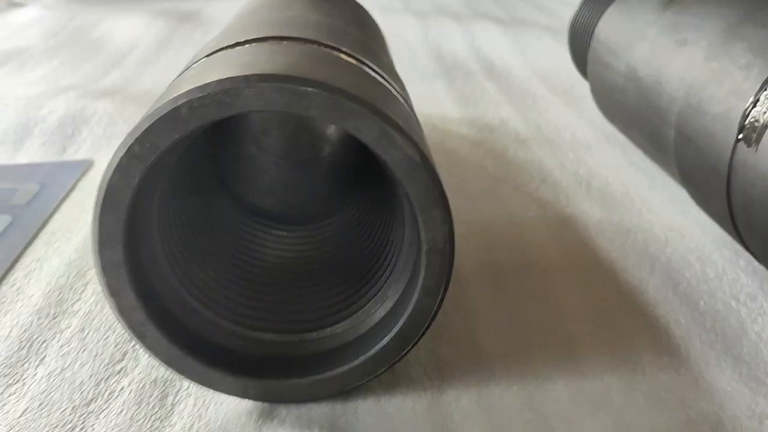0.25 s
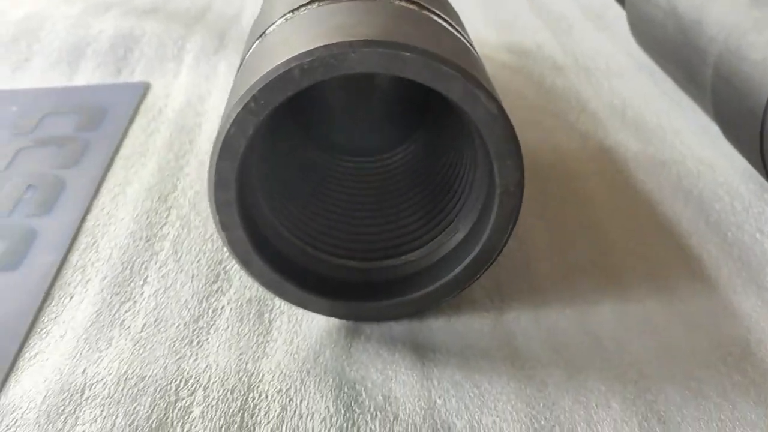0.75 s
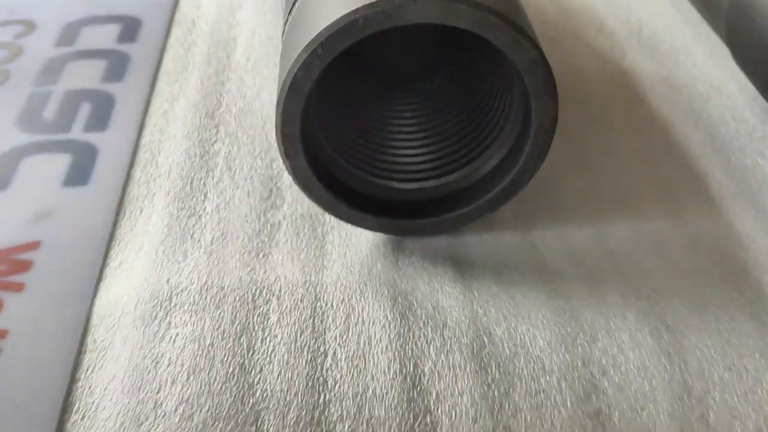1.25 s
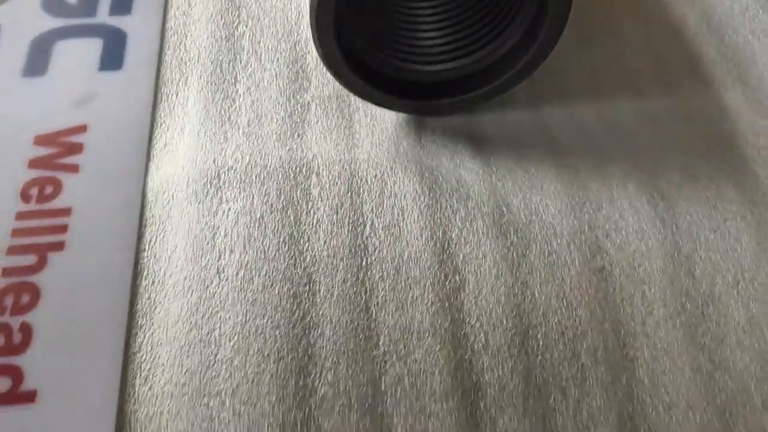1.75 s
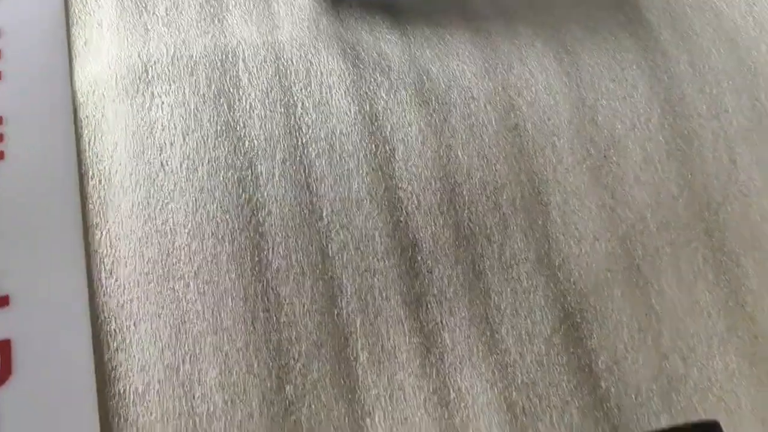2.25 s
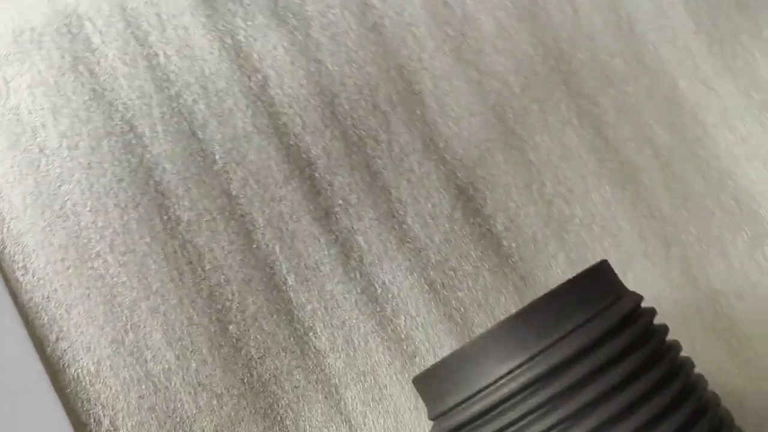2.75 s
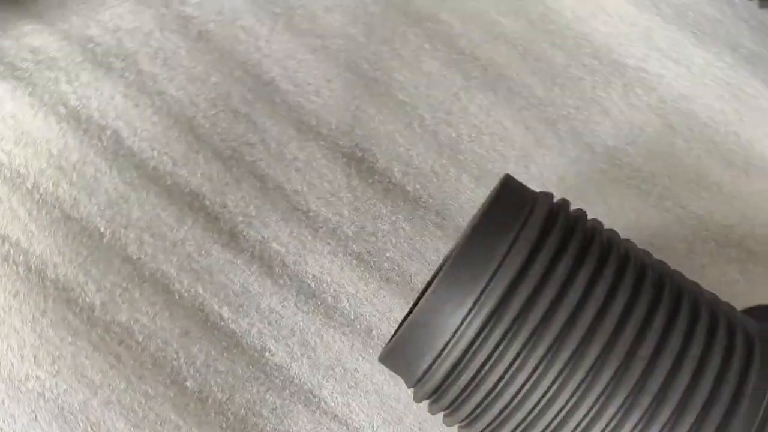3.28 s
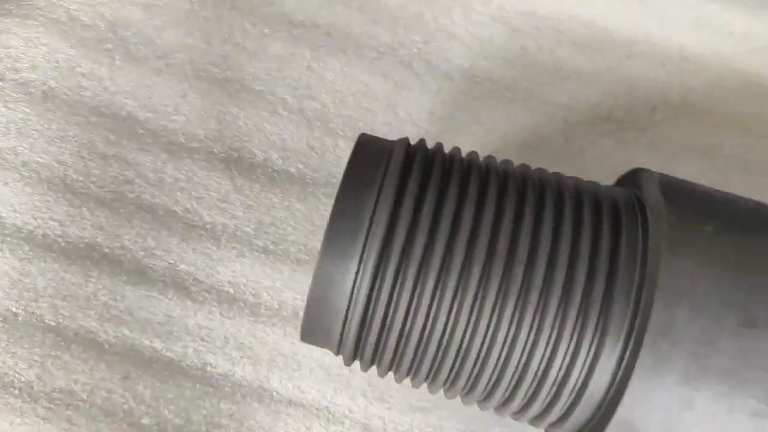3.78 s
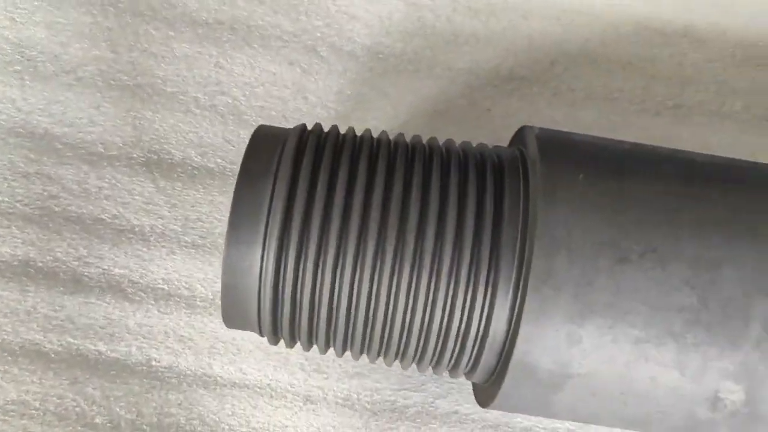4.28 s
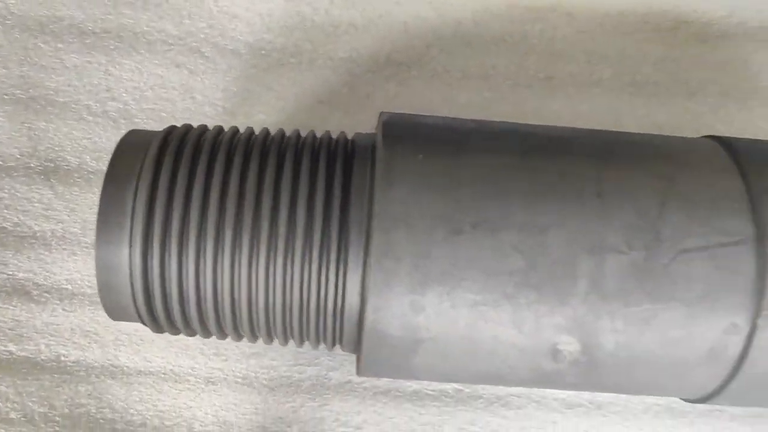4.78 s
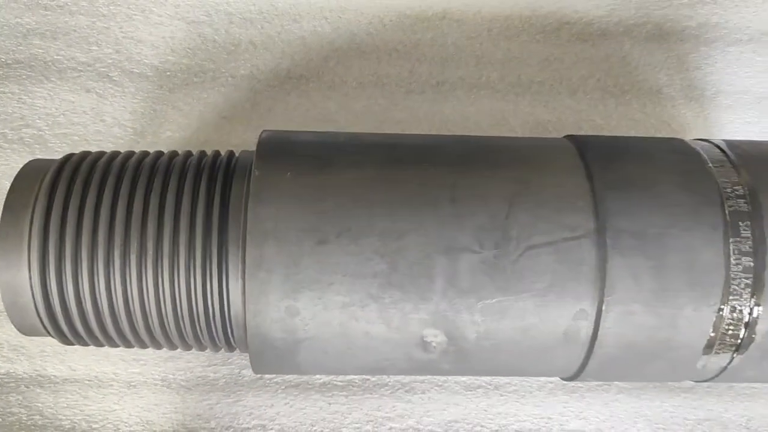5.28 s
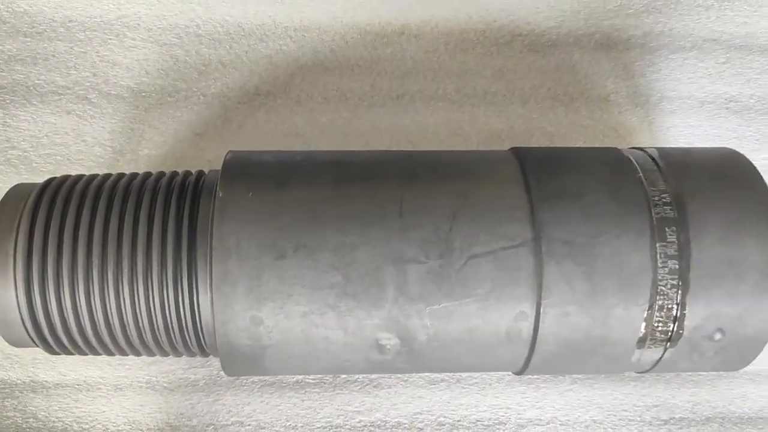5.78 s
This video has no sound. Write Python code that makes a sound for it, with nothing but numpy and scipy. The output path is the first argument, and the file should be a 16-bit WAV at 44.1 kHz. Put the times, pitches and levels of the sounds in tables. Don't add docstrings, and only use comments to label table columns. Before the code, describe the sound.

A constant dull machinery drone, loose clatter and rushing air fill a big indoor hall, heard through a hand-held mono phone. Three piercing but faint gear tones drift in and out. After one distant knock, something taps the phone body twice, quietly then harder. Later, far metal is knocked and scraped in quick succession with deep echoing thuds, and the machine noise continues, a little softer, to the end.

```python
import sys
import numpy as np
from scipy import signal
from scipy.fft import rfft, irfft
from scipy.io import wavfile

SR = 44100
rng = np.random.default_rng(int(sys.argv[2]) if len(sys.argv) > 2 else 0)


def transcribe(signal):
    frames = np.atleast_2d(signal).T
    limited = np.clip(frames, -1, 1)
    pcm = np.round(limited * 32767).astype(np.int16)
    wavfile.write(sys.argv[1], SR, pcm)


def volts_from_db(level):
    exponent = np.asarray(level, float) / 20
    return 10 ** exponent


N = 265923
T = np.arange(N) / SR

# (time [s], level [dB])
LOAD_CURVE = [(0.0, -36.5), (0.47, -39), (0.89, -39), (1.28, -42.5), (2.5, -45), (3.21, -43), (3.59, -43),
              (3.9, -42), (4.1, -38.5), (4.6, -36), (4.79, -38), (6.03, -44.5)]
# (time [s], level [dB])
FACING_CURVE = [(0, -40.5), (.2, -43.5), (.7, -45.5), (.92, -47.5), (1.15, -43), (1.6, -42.5), (2.0, -41),
                (2.68, -41), (2.79, -47), (3.4, -49), (4.17, -48.5), (4.23, -43.5), (4.32, -49), (4.8, -50),
                (6.03, -48.5)]
# (time [s], level [dB])
FLOW_CURVE = [(0, -37.5), (.35, -40), (.95, -44.5), (1.15, -38), (1.5, -39.5), (2.6, -38), (2.85, -39.5),
              (3.28, -41), (3.45, -46), (4.15, -44.5), (4.8, -41.5), (5.1, -45.5), (6.03, -44.5)]
LAYER_LEVELS = {"rumble": (-46.5, 0.81, -0.17, -0.17, 3), "drone": (-39, 0.7, 0.22, -0.06, 40),
                "upper drone": (-43, 1.27, -0.1, 0.31, 40), "clatter": (-41, 0.36, 0.1, 0.22, 40),
                "hiss": (-41.5, 0.17, -0.01, 0.9, 60), "upper hiss": (-43.5, 0.51, 0.63, 0.36, 60),
                "top": (-45.5, 0.26, 0.66, 0.15, 90), "jet": (-54.5, -0.5, 2, 0.1, 150)}

# (frequency [Hz], level [dB per Hz])
RUMBLE_COLOUR = [(30, -48), (40, -40), (55, -20), (80, -4.5), (110, 1), (150, 3.5), (185, -20.5)]
DRONE_COLOUR = [(140, -18), (175, -3.5), (220, -2), (280, -2.5), (340, -20.5)]
UPPER_DRONE_COLOUR = [(260, -18), (310, 1), (350, 0.5), (395, -7), (440, -4.5), (510, -15), (580, -30)]
CLATTER_COLOUR = [(260, -20), (450, -15), (549, -6.5), (674, -0.5), (811, -7.5), (902, -5), (1200, -9),
                  (1390, -6), (1620, -10), (2400, -6), (2450, -22), (3180, -4), (5390, -120)]
HISS_COLOUR = [(2200, -50.5), (2450, 5), (3000, -2.5), (3800, 5), (4250, 1.5), (4450, -2.5), (4700, -5)]
UPPER_HISS_COLOUR = [(4200, -5), (4450, -2.5), (4900, 2.5), (5300, -2), (6500, -1), (7300, -1.5),
                     (7800, -7.5), (8200, -32)]
# (frequency [Hz], level [dB per Hz])
FILL_COLOUR = [(4880, -57), (8300, -7.5), (8510, -35), (9010, -9), (9630, -3), (11500, 2), (13100, 0),
               (14500, 4.5), (15200, 3.5), (16000, -13)]
# (frequency [Hz], level [dB per Hz])
JET_COLOUR = [(9500, -27), (11000, -0.5), (12500, 0.5), (14300, -4), (15300, -32)]

# (time [s], burst [dB], burst length [s], plate ring [dB], thud [dB])
KNOCK_EVENTS = [
    (1.16, -39, 0.027, -49, -40.5),
    (3.272, -52.5, 0.026, -44, -52.5),
    (3.906, -34, 0.045, -44, -30),
    (4.184, -36.5, 0.15, -47.5, -54),
    (4.243, -39.5, 0.025, -57, -49),
    (4.393, -40, 0.082, -47, -31.5),
    (4.59, -39.5, 0.077, -42.5, -38.5),
    (4.659, -41.5, 0.058, -56, -48.5),
]
# (frequency [Hz], level [dB per Hz])
BURST_COLOUR = [(500, -7.5), (900, -6), (1500, -4), (3000, -4), (5000, -17.5), (7300, -12), (8000, -46.5)]
# (frequency [Hz], level [dB], time to fall 60 dB [s])
PLATE_MODES = [(1395, 4.5, 0.17), (2050, -0.5, 0.23), (2960, -7.5, 0.052)]
# (time [s], swing [dB], body note [Hz], time to fall 60 dB [s], sharp edge [dB])
TAP_EVENTS = [
    (2.1516, -22, 330, .016, -23),
    (2.1517, -22, 1200, .004, -60),
    (2.1686, -40, 900, .003, -26),
    (2.7731, -12.5, 1050, .003, -20),
]

# (frequency [Hz], width [Hz])
HUM_NOTES = [(217, 12), (144.5, 9)]
# (time [s], level [dB], half length [s])
HUM_SWELLS = [
    [(0, -43, .3), (1.15, -36, .3), (1.7, -39.5, .3), (3.3, -47, .8), (4.55, -40, .3)],
    [(2.62, -45, .15), (4.65, -44, .2), (5.15, -42, .3)],
]
HUM_FLOOR = (-55.5, -58)
WHINE_TONES = (2509, 4384.5, 5018)
# (time [s], level [dB], half length [s])
WHINE_SWELLS = [
    [(.46, -53, .44), (.98, -57, .1), (1.65, -51, .42), (2.54, -51.5, .39), (3.14, -50, .28),
     (3.79, -47, .28), (4.32, -48.7, .35), (5.04, -44, .3), (5.97, -52, .29)],
    [(.48, -52, .1), (.71, -55.6, .21), (1.64, -43.7, .27), (2.11, -43.7, .25), (2.95, -39.6, .22),
     (4.13, -53.4, .25), (4.79, -56, .12), (5.4, -59, .4)],
    [(.16, -43, .41), (.7, -45.2, .1), (1.29, -36.9, .24), (1.79, -38.7, .4), (2.58, -37.6, .25),
     (3.11, -44.4, .1), (3.47, -45.4, .1), (3.99, -40.4, .23), (5.15, -42.4, .4), (5.7, -54.4, .47)],
]
WHINE_FLOOR = (-66, -56.5, -66)

# (frequency [Hz], level over the masking level [dB])
STORED_LEVEL = [(100, -30), (1500, -11), (2050, -6), (2350, -2.5), (2800, -6), (3500, -6), (4700, -3),
                (5400, -5.5), (6200, -4.5), (7500, -2), (8500, 5), (10000, 0), (12000, -2.5), (13200, -2),
                (14500, -6), (15700, 2)]


def rms_one(x):
    return x / np.sqrt(np.mean(x ** 2) + 1e-20)


def swing_db(curve):
    seconds, level = np.transpose(curve)
    db = np.interp(T, seconds, level)
    return db - db.mean()


def drift(rate):
    r = np.exp(-80 * np.pi * rate / SR)
    chance = rng.standard_normal(N // 40 + 2002)
    slow = signal.lfilter([1], [1, -2 * r, r * r], chance)[2000:]
    return np.interp(np.arange(N) / 40, np.arange(len(slow)), rms_one(slow))


def coloured(colour, patchy_db, rate, count):
    hz = np.fft.rfftfreq(N, 1 / SR) + 1e-3
    points_hz, points_db = np.transpose(colour)
    shape = volts_from_db(np.interp(np.log(hz), np.log(points_hz), points_db, -200, -200))
    spectrum = rfft(rng.standard_normal(N)) * shape
    place = np.log(hz / points_hz[0]) / np.log(points_hz[-1] / points_hz[0]) * (count - 1)
    out = 0
    for k in range(count):
        band = irfft(spectrum * np.clip(1 - abs(place - k), 0, 1), N)
        out = out + band * volts_from_db(patchy_db * drift(rate))
    return rms_one(out)


def ring(x, hz, t60):
    r = volts_from_db(-60 / (t60 * SR))
    w = 2 * np.pi * hz / SR
    return signal.lfilter([0, np.sin(w)], [1, -2 * r * np.cos(w), r * r], x + 1e-18)


def gain_for(layer, lag=0):
    mean_db, load, facing, flow, fall = LAYER_LEVELS[layer]
    db = load * swing_db(LOAD_CURVE) + facing * swing_db(FACING_CURVE) + flow * swing_db(FLOW_CURVE)
    db = np.interp(T - lag, T, db)
    return volts_from_db(mean_db + np.maximum.accumulate(db + fall * T) - fall * T)


def spots(rows, between_db):
    gain = volts_from_db(between_db)
    for s, db, half in rows:
        gain = gain + volts_from_db(db) * np.exp(-((T - s) / half) ** 2)
    return gain


def hall_rumble():
    return gain_for("rumble", lag=0.35) * coloured(RUMBLE_COLOUR, 1.0, 3.7, count=3)


def far_knocks():
    hall_t60, tail_db = 1.7, -4.5
    burst, strikes, thud = np.zeros((3, N))
    for s, burst_db, length, ring_db, thud_db in KNOCK_EVENTS:
        age = np.maximum(T - s, 0)
        tail = (T >= s) * volts_from_db(-60 * age / hall_t60)
        held = (T >= s) * np.exp(-(age / length) ** 4)
        rise = 1 - np.exp(-age / (0.03 * length))
        burst += volts_from_db(burst_db) * (held + volts_from_db(tail_db) * tail) * rise
        strikes += volts_from_db(ring_db) * held
        thud += volts_from_db(thud_db) * tail * (1 - np.exp(-age / 0.041))
    plate = 0
    for hz, db, t60 in PLATE_MODES:
        rubbing = strikes * rng.standard_normal(N)
        plate = plate + volts_from_db(db) * ring(rubbing, hz, t60) / np.sqrt(t60 * SR / 27.6)
    low = coloured([(90, -19.5), (200, -6), (400, -10.5), (900, -14), (1200, -25)], 1.2, 9.1, count=4)
    return burst * coloured(BURST_COLOUR, 3.9, 37.0, count=8) + plate + thud * low


def jolt(age, hz, t60):
    rise_s = .00007
    fade = volts_from_db(-60 * np.maximum(age - .5 / hz, 0) / t60)
    swing = -np.cos(2 * np.pi * hz * age) * fade
    return swing * np.exp(np.minimum(age, 0) / rise_s)


def finger_taps():
    out = 0
    for s, body_db, hz, t60, edge_db in TAP_EVENTS:
        out = out + volts_from_db(body_db) * jolt(T - s, hz, t60)
        out = out + volts_from_db(edge_db) * jolt(T - s, 1900, .0013)
    return out


def air_hiss():
    out = gain_for("hiss") * coloured(HISS_COLOUR, 1.5, 8.7, count=8)
    return out + gain_for("upper hiss") * coloured(UPPER_HISS_COLOUR, 2.8, 22.0, count=8)


def casing_hum():
    out = 0
    for rows, db, (hz, width) in zip(HUM_SWELLS, HUM_FLOOR, HUM_NOTES):
        t60 = np.log(1000) / np.pi / width
        out = out + spots(rows, db) * rms_one(ring(rng.standard_normal(N), hz, t60))
    return out


def machine_drone():
    out = gain_for("drone") * coloured(DRONE_COLOUR, 0.66, 4.8, count=3)
    out += gain_for("upper drone") * coloured(UPPER_DRONE_COLOUR, 0.88, 6.6, count=3)
    return out + gain_for("clatter") * coloured(CLATTER_COLOUR, 1.46, 12.0, count=6)


def machine_whine():
    flutter_db, wander_hz = 1.3, 1.3
    sag = 5e-4
    out = 0
    for hz, rows, db in zip(WHINE_TONES, WHINE_SWELLS, WHINE_FLOOR):
        pitch = hz * (1 - sag * T / T[-1]) + wander_hz * drift(15.0)
        tone = np.sqrt(2) * np.sin(2 * np.pi * np.cumsum(pitch) / SR)
        out = out + spots(rows, db) * volts_from_db(flutter_db * drift(29.0)) * tone
    return out


def scene():
    soften = signal.butter(8, 7400, fs=SR, output="sos")
    blows = signal.sosfilt(soften, far_knocks() + finger_taps())
    machine = hall_rumble() + air_hiss() + casing_hum() + machine_drone() + machine_whine()
    return np.tile(machine + blows, (2, 1))


def top_band():
    out = gain_for("top") * coloured(FILL_COLOUR, 2.9, 31.0, count=10)
    return out + gain_for("jet") * coloured(JET_COLOUR, 1.4, 16.0, count=4)


def coarse_storage(x, size=1024, order=8):
    frame_start, spread_hz = 525, 400
    follow = .6
    uneven_db, wide_db, step_db = 4, 3, 6
    thrift_db, thrift_share = -.7, .3

    n, k = np.arange(2 * size) + .5, np.arange(size) + .5
    window = signal.windows.kaiser_bessel_derived(2 * size, 4 * np.pi)
    waves = np.cos(np.pi / size * np.outer(n + size / 2, k))
    basis = np.sqrt(2 / size) * window[:, None] * waves
    lead = size - frame_start
    padded = np.pad(x, (size + lead, 2 * size - (N + lead) % size)).reshape(-1, size)
    lines = np.hstack([padded[:-1], padded[1:]]) @ basis

    hz = (np.arange(size // order) + .5) * order * SR / 2 / size
    power = np.mean(lines.reshape(len(lines), -1, order) ** 2, axis=2)
    reach = np.exp(-abs(hz[:, None] - hz) / spread_hz)
    mask_db = 10 * np.log10(power @ (reach / reach.sum(axis=0)) + 1e-14)
    usual_db = mask_db.mean(axis=0)

    stored_hz, stored_db = np.transpose(STORED_LEVEL)
    need_db = np.interp(np.log(hz), np.log(stored_hz), stored_db, right=60)
    facing = np.interp(np.arange(len(power)) * size / SR, T, swing_db(FACING_CURVE))
    need_db = need_db + np.outer(thrift_db - thrift_share * facing, hz > 4000)
    wide = np.repeat(rng.standard_normal((len(power), size // order // 4)), 4, axis=1)
    chance_db = uneven_db * wide * (hz > 6000) + wide_db * rng.standard_normal(power.shape) / 2
    bar = volts_from_db(usual_db + follow * (mask_db - usual_db) + need_db + chance_db)

    step = np.repeat(bar * volts_from_db(step_db), order, axis=1)
    kept = np.repeat(power > bar ** 2, order, axis=1)
    rounded = np.sign(lines) * np.floor(abs(lines) / step + .45) * step
    halves = (kept * rounded) @ basis.T
    return (halves[1:, :size] + halves[:-1, size:]).ravel()[lead:lead + N]


def top_cut(x):
    return signal.sosfilt(signal.butter(12, 16310, fs=SR, output="sos"), x)


def record(dry):
    bass_cut = signal.butter(2, 45, "high", fs=SR, output="sos")
    heard = signal.sosfilt(bass_cut, dry[0])
    stored = coarse_storage(heard + top_band())
    return top_cut(np.tile(stored, (2, 1)))


dry = scene()
out = record(dry)
transcribe(out)
```